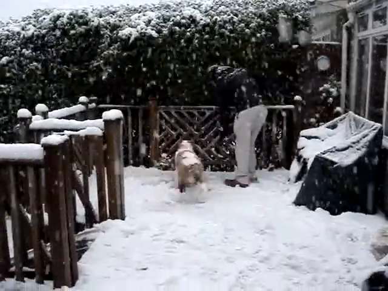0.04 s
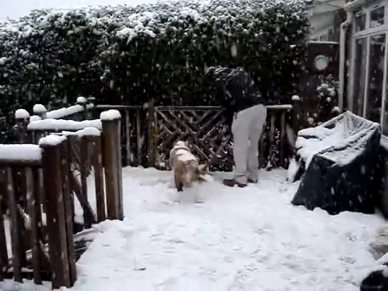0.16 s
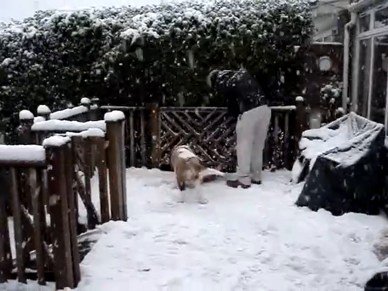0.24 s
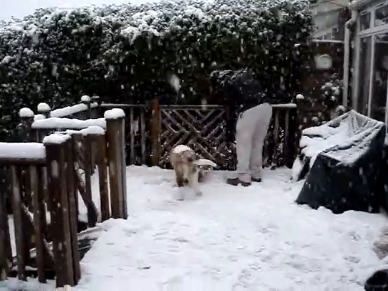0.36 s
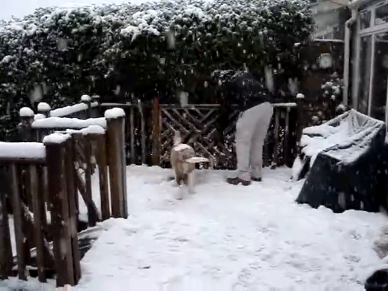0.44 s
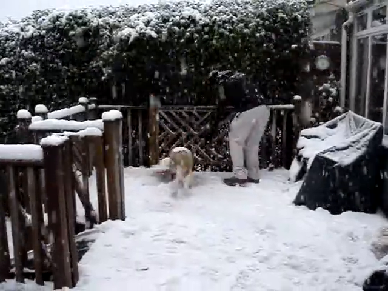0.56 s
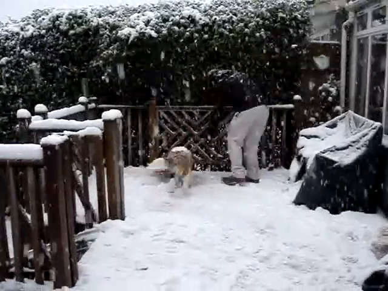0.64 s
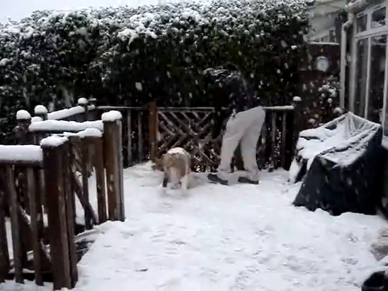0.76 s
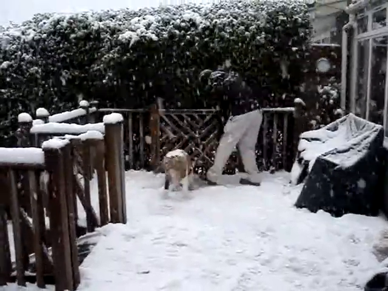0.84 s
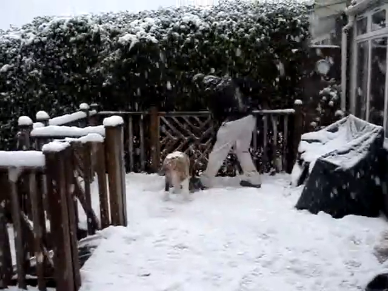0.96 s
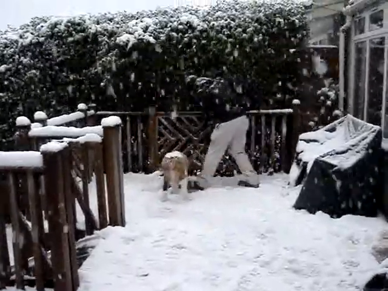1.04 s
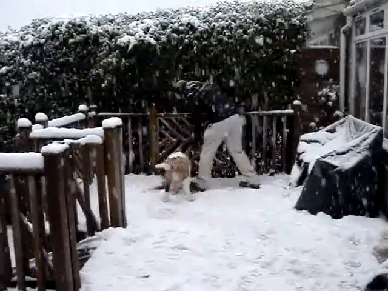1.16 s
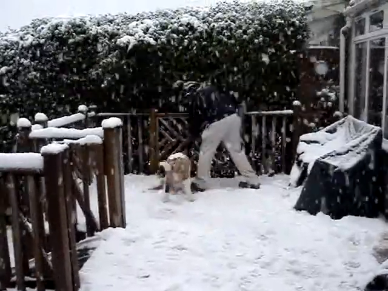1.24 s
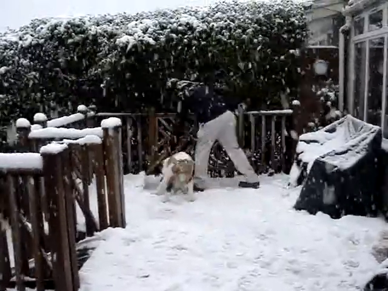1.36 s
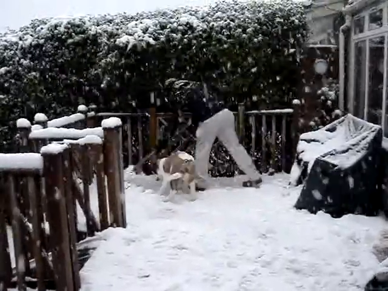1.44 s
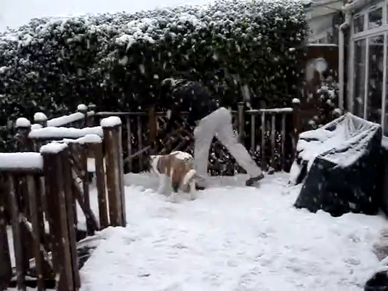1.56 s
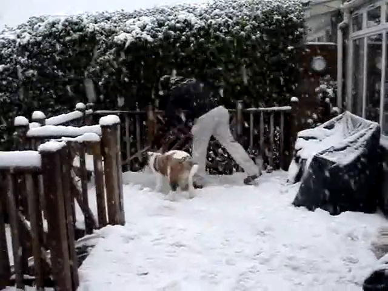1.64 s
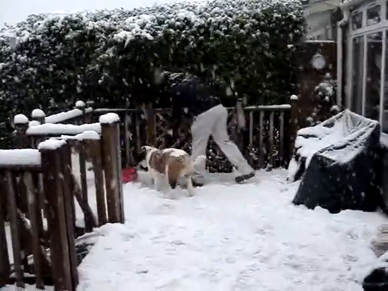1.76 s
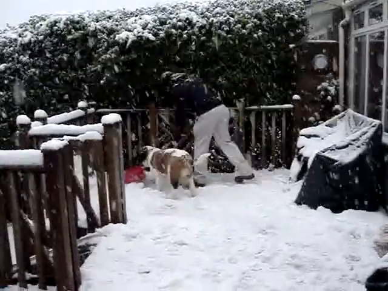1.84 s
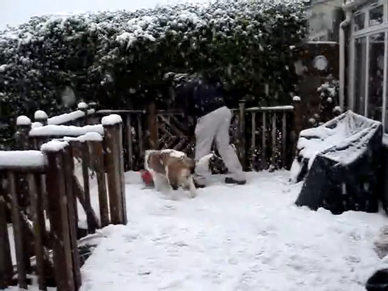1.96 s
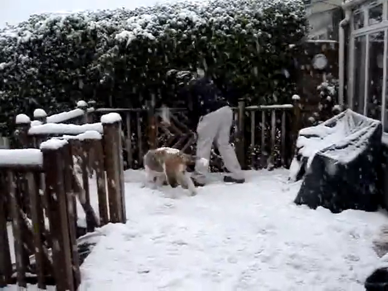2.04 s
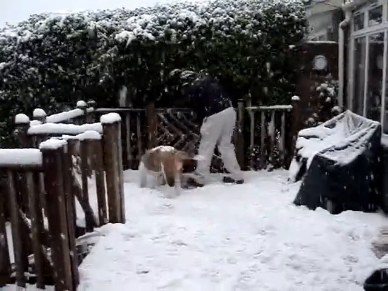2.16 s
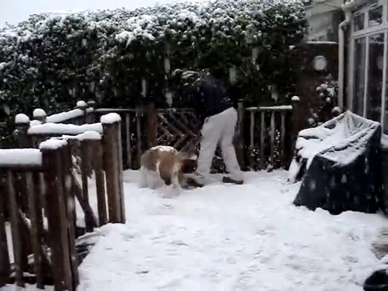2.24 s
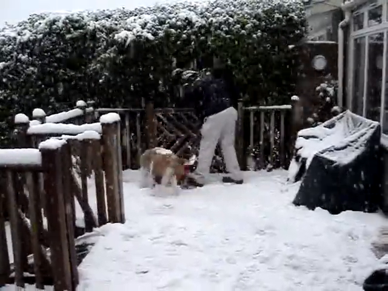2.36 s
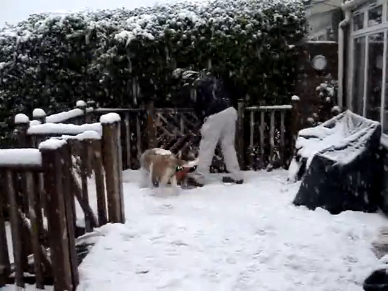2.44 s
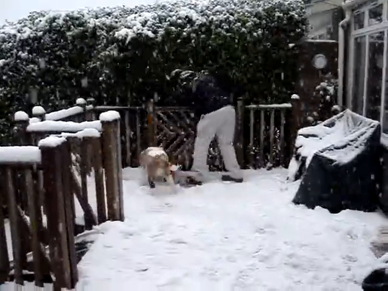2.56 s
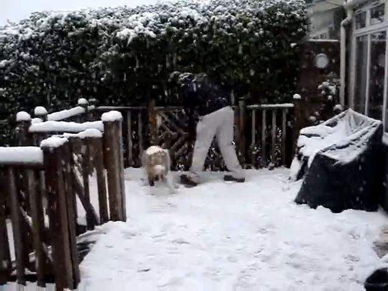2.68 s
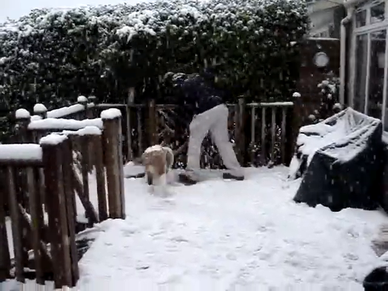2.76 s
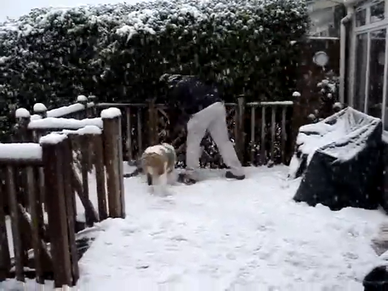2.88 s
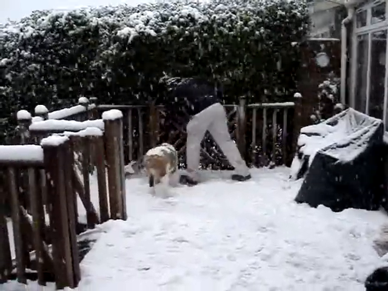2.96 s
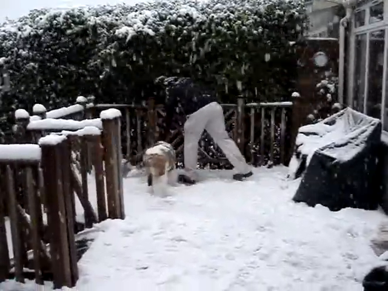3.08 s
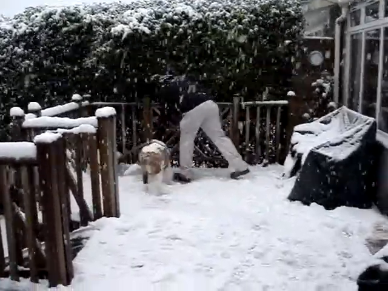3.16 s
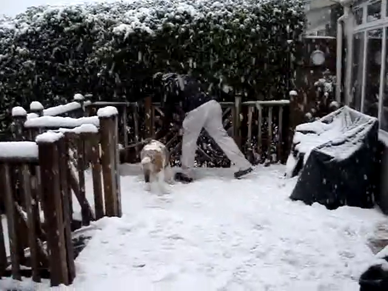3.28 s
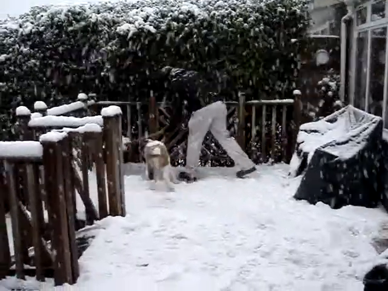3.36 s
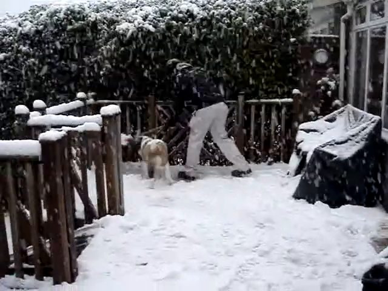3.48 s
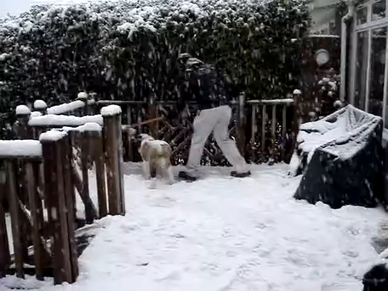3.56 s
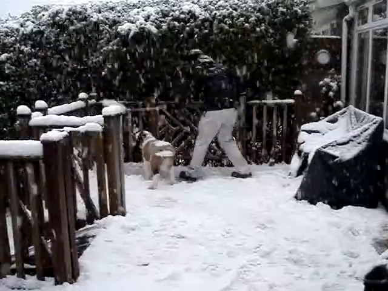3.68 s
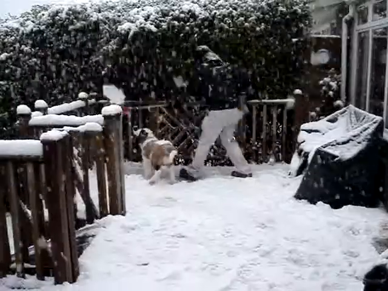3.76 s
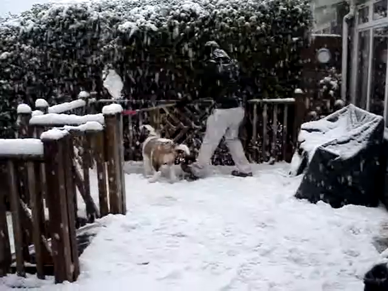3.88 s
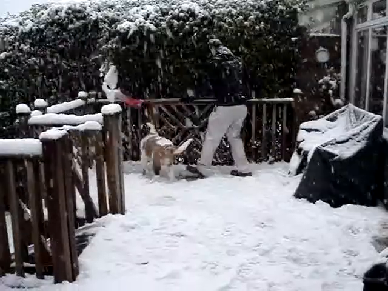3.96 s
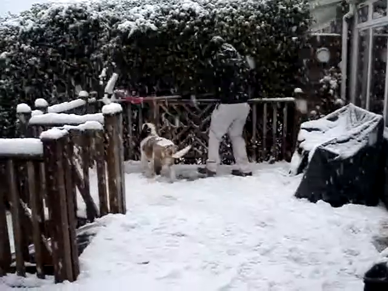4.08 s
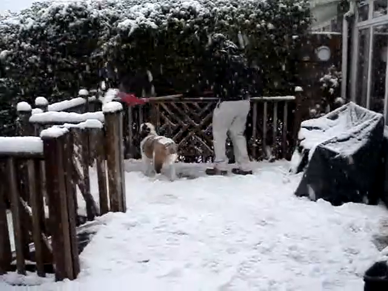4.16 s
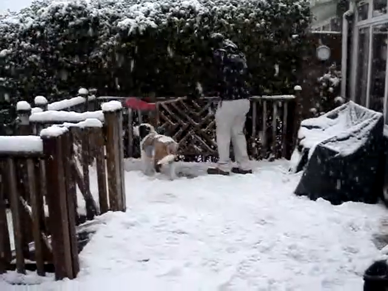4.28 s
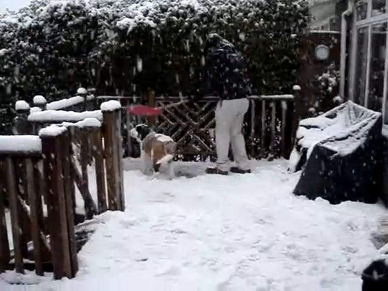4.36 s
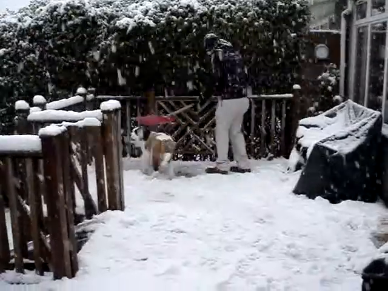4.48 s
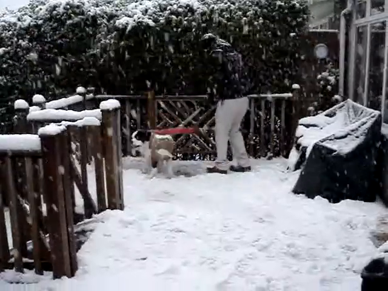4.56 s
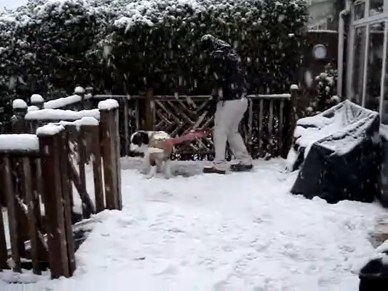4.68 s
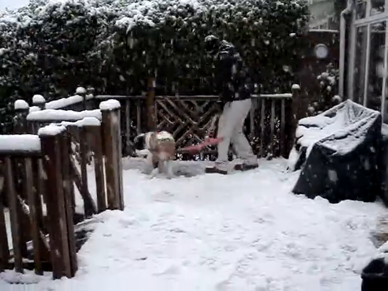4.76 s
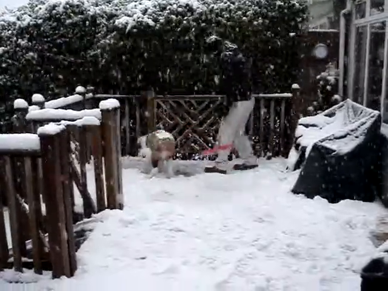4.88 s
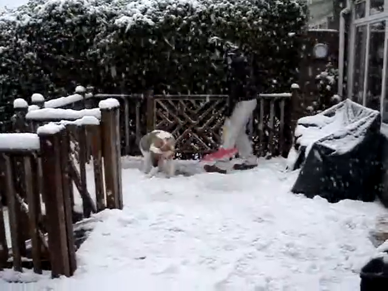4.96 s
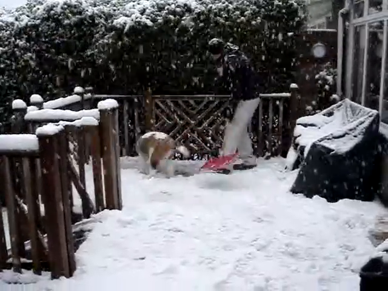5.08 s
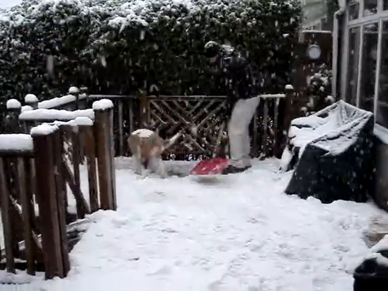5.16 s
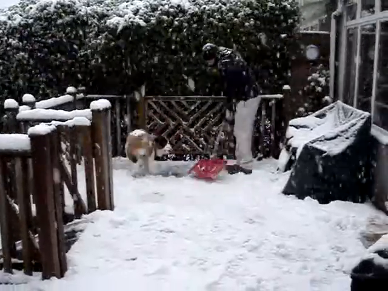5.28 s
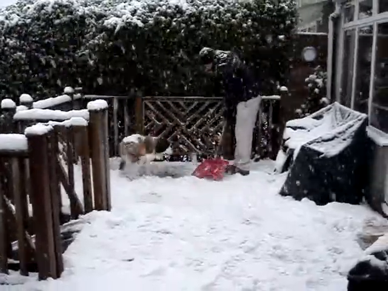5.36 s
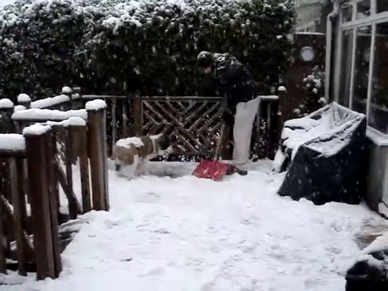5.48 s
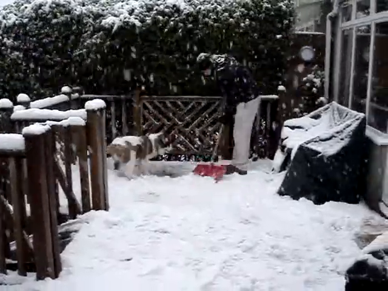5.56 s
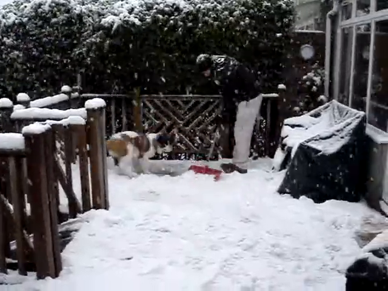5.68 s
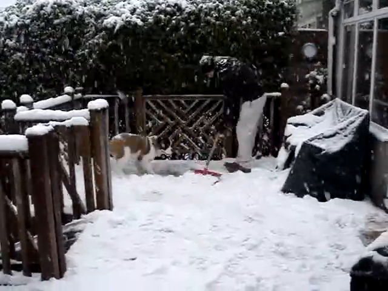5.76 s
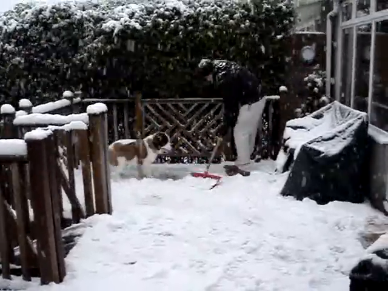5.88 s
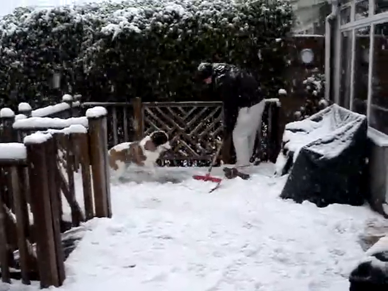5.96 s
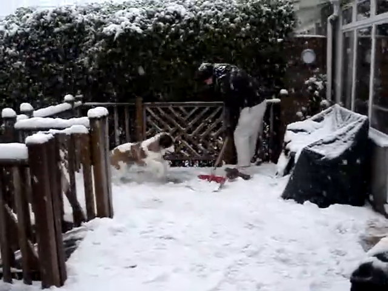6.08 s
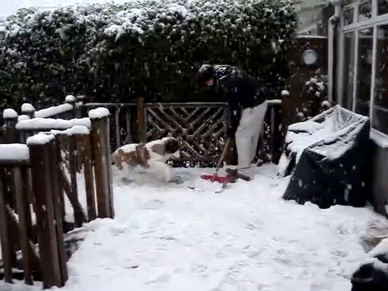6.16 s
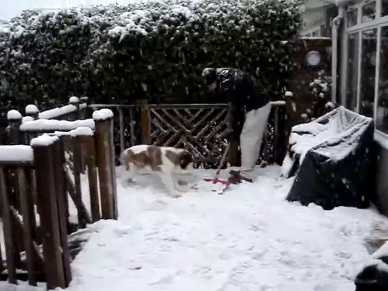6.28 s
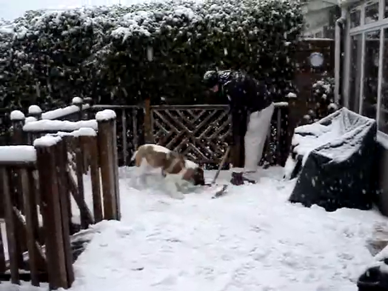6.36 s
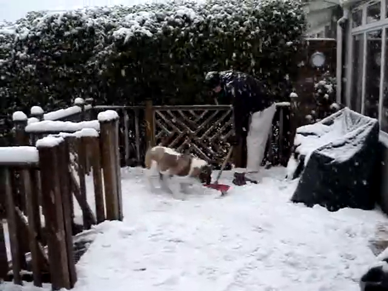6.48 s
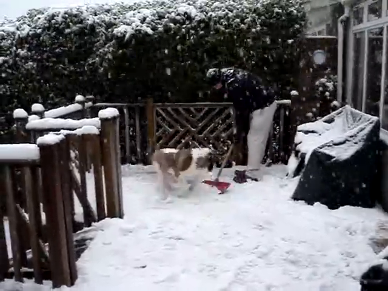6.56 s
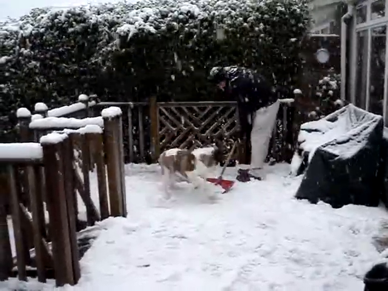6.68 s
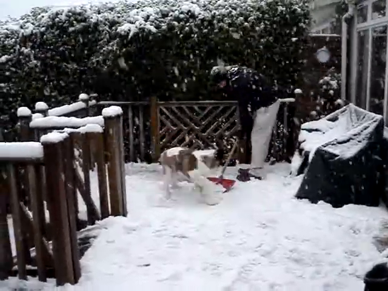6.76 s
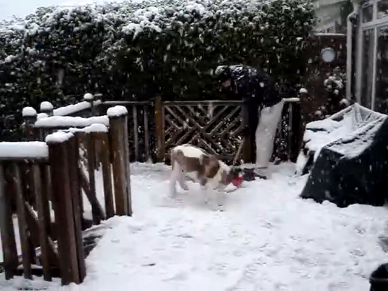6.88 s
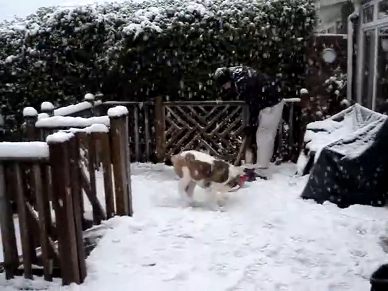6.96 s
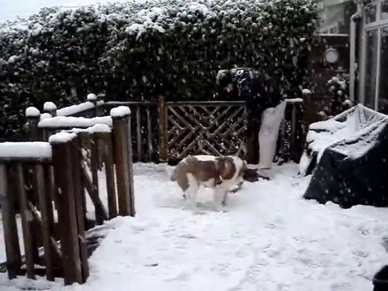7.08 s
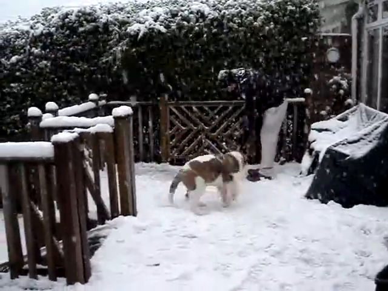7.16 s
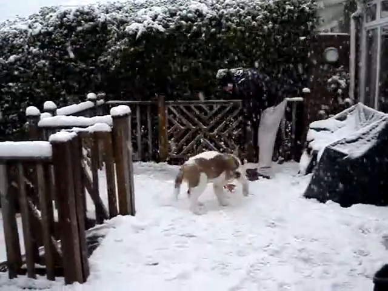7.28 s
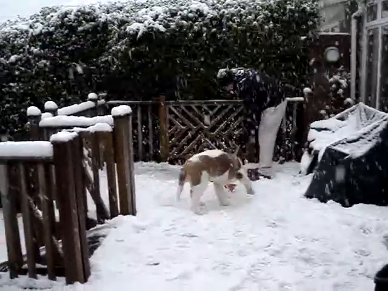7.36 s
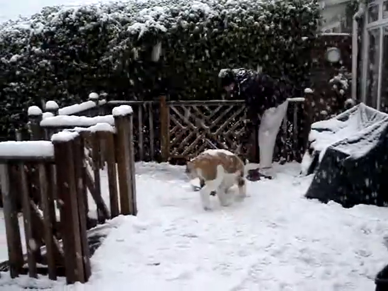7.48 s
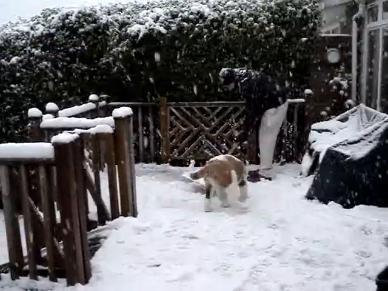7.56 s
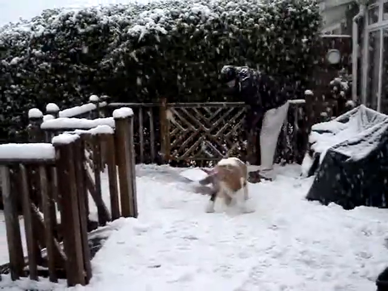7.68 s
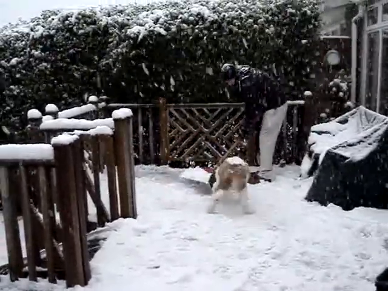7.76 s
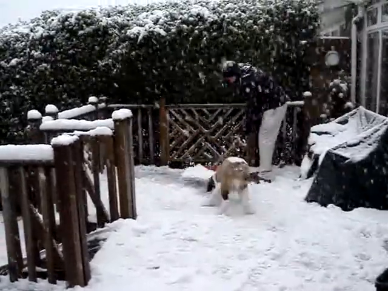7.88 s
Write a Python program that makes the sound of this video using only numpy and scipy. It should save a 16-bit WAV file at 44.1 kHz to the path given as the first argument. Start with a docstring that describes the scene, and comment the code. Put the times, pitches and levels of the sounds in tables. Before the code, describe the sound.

A plastic shovel scrapes through icy snow on a wooden deck a few metres away, in three short gritty strokes. In the pause that follows, boots and a dog's paws thud softly on the hollow boards and a load of snow is tossed with a brief rush. Three more scrapes follow, the blade knocking as it catches on the boards. The yard adds a slight echo and a faint steady hiss.

```python
"""A plastic snow shovel scrapes in short strokes over a snowy wooden deck, a few metres away.
Its edge grinds through icy snow, catches on boards and sets the blade ringing.
Boots and a dog's paws thud on the hollow deck and crunch the snow; loose snow slides and drops.
House wall and fence echo, and the garden hisses faintly."""
import sys
import numpy as np
from scipy import signal
from scipy.fft import rfft, irfft, next_fast_len
from scipy.io import wavfile
from scipy.ndimage import uniform_filter1d, map_coordinates

SR = 44100
rng = np.random.default_rng(int(sys.argv[2]) if len(sys.argv) > 2 else 0)


def master(y):
    """Save y as 16-bit WAV."""
    cut = np.clip(np.atleast_2d(y).T, -1, 1)
    pcm = np.round(cut * 32767)  # scale
    wavfile.write(sys.argv[1], SR, pcm.astype(np.int16))


N = 349707
TIME_S = np.arange(N) / SR

# envelopes, one table per stroke: time_s, edge_db, body_db
STROKES = [
    [(0.352, -38.5, -43), (0.368, -27, -30), (0.398, -16.5, -22), (0.416, -12.5, -25), (0.5, -13.5, -28.5),
     (0.572, -43.5, -43), (0.6, -47, -27)],
    [(1.034, -41, -49), (1.042, -32, -40), (1.058, -27.5, -29.5), (1.094, -19.5, -29.5),
     (1.138, -15, -28.5), (1.158, -21, -35.5), (1.206, -17, -26.5), (1.286, -23, -43), (1.3, -20, -38.5),
     (1.446, -24, -26), (1.48, -35, -51), (1.53, -60, -57)],
    [(2.474, -59, -57), (2.48, -29.5, -45), (2.49, -24.5, -34.5), (2.576, -16, -25), (2.638, -19.5, -29),
     (2.672, -14.5, -20.5), (2.702, -21, -30.5), (2.748, -18.5, -24.5), (2.874, -23.5, -34.5),
     (2.912, -20.5, -25), (2.982, -19.5, -30.5), (3.1, -44.5, -45.5)],
    [(5.54, -40, -47), (5.558, -41, -43.5), (5.586, -28, -39), (5.61, -28.5, -39), (5.638, -17.5, -21),
     (5.66, -14.5, -21.5), (5.732, -21.5, -19.5), (5.796, -21, -22.5), (5.81, -22.5, -25.5),
     (5.838, -20.5, -19.5), (5.96, -55.5, -57)],
    [(6.0, -55, -57), (6.036, -50, -48.5), (6.05, -47, -50), (6.06, -43.5, -42), (6.074, -43.5, -47),
     (6.15, -39.5, -37), (6.21, -40.5, -41), (6.248, -50, -55), (6.258, -52, -64), (6.264, -48.5, -55),
     (6.295, -42, -43)],
    [(6.293, -47.5, -41), (6.325, -24, -25), (6.371, -21.5, -19.5), (6.389, -22.5, -30),
     (6.399, -36.5, -36), (6.421, -25, -28.5), (6.467, -48.5, -56), (6.49, -53, -49)],
    [(6.86, -51, -57), (6.878, -51.5, -61), (6.898, -51, -43), (6.918, -45, -54), (6.932, -43.5, -44.5),
     (7.006, -45, -46), (7.018, -53, -49), (7.04, -57, -63), (7.046, -70, -59), (7.058, -47, -49),
     (7.068, -49, -48), (7.075, -42, -41)],
    [(7.073, -40, -53), (7.089, -35, -26.5), (7.121, -28, -26.5), (7.135, -28, -19.5), (7.161, -27, -30),
     (7.175, -32, -40), (7.188, -24, -18.5)],
    [(7.186, -19, -21), (7.194, -23, -18), (7.222, -23.5, -13), (7.238, -22.5, -32), (7.278, -31.5, -23),
     (7.338, -53, -52), (7.36, -59, -57)],
]
# deck contact per stroke: scoop_db, lip_db, boards_db (all re body_db), tilt_db
CONTACTS = [(-7, -10.5, -10.5, 2), (-6, -6, -9, 1.4), (-6, -1.5, -7, 1.3), (-3, -2, -12.5, -0.56),
            (-5, -1, -22, -1.8), (-8, -0.5, -16, -2), (-2, -3, -5, 0), (-4.5, -5, -12, -0.5),
            (-3, -5.5, -17, -1.6)]
# edge on icy snow: freq_hz, density_db
GRIT_SPECTRUM = [(29, -38), (50, -12), (173, -3), (252, -5), (321, 1), (410, -24), (625, -2.5), (2210, -2),
                 (3150, -0.5), (6540, -5), (8530, -10.5), (9960, -20), (12900, -56.5), (21900, -120)]
# blade, four scoop modes then the lip's: freq_hz, width_hz, level_db
BLADE_MODES = [(508, 24, -4), (559, 30, 0), (668, 36, -6), (723, 20, 0), (1060, 80, -1), (1514, 40, -1),
               (1745, 55, -4), (2350, 100, -7), (2620, 50, -6), (2990, 55, -6), (3390, 100, -4)]
# edge catching on a board: start_s, peak_db
CATCHES = [(0.472, -18), (2.674, -22.5), (2.763, -14.5), (2.903, -12.5), (5.661, -15.5), (5.72, -5.5),
           (6.365, -4), (7.11, -10.5), (7.154, -10), (7.193, -6), (7.211, -21.5), (7.223, 0)]
# footfalls and knocks: start_s, pitch_hz, ring_db, clack_db, weight_db
STEPS = [(.056, 245, -29.5, -32, -14.5), (0.167, 104, -43, -40.5, -50), (.196, 200, -38, -42, -61),
         (.31, 250, -32.5, -41, -50), (.589, 150, -27, -36.5, -47), (.724, 104, -37.5, -40, -32),
         (.982, 250, -40.5, -47, -58), (1.57, 170, -43, -52, -65), (1.659, 140, -37.5, -60, -53),
         (2.007, 100, -48, -64, -29), (2.062, 140, -38.5, -42, -46), (2.274, 170, -34, -31, -58),
         (2.365, 166, -20.5, -38.5, -32), (3.384, 330, -39, -50, -31), (3.434, 330, -41, -50, -45),
         (3.684, 300, -38, -42.5, -41), (3.764, 166, -33.5, -47, -43), (3.964, 330, -46, -40.5, -62),
         (4.049, 330, -38, -43, -64), (4.251, 320, -44, -47, -55), (4.384, 104, -37, -49, -50),
         (4.458, 104, -33, -43.5, -35), (4.49, 100, -39, -59, -29), (4.557, 140, -27, -35.5, -39),
         (4.69, 150, -34.5, -36, -41), (4.862, 166, -25.5, -35.5, -29), (4.957, 125, -32.5, -42.5, -49),
         (5.026, 166, -24.5, -40, -42), (5.136, 170, -46, -43.5, -52), (5.263, 170, -24.5, -29.5, -35),
         (5.311, 320, -31.5, -44, -21.5), (5.337, 300, -32, -41.5, -30), (5.378, 170, -38, -45, -34),
         (5.499, 104, -54, -47, -30), (5.561, 166, -33, -40.5, -28), (5.89, 380, -25, -37.5, -21),
         (6.251, 110, -40, -50, -54), (6.412, 166, -39, -29.5, -25), (6.799, 166, -44.5, -50.5, -41),
         (6.996, 320, -41.5, -43, -61), (7.472, 115, -20, -24, -41), (7.528, 110, -32, -40, -46),
         (7.622, 166, -37, -42, -52), (7.654, 250, -43, -47.5, -55)]
# hollow deck: freq_hz, width_hz
DECK_MODES = [(58, 24), (97, 28), (120, 24), (166, 26), (250, 45), (322, 40), (420, 50), (570, 70),
              (720, 80), (1050, 160)]
# snow sliding, dropped or thrown: start_s, level_db, rise_s, t60_s, tilt_db
PUFFS = [(0.2, -32.5, .02, 0.1, -2), (0.228, -35.5, .003, 0.059, -1), (0.648, -30.5, 0.0029, 0.069, 1),
         (.7, -41, .004, 0.14, 5.5), (1.6, -34, .004, 0.074, -3.5), (1.873, -45.5, 0.0061, 0.62, 1),
         (2.066, -50, 0.0044, .3, 4), (2.158, -37.5, 0.0029, 0.083, -2), (2.274, -45.5, 0.0027, 0.088, -2),
         (2.359, -29, .002, 0.051, -1.5), (3.391, -38, 0.0023, 0.09, -1), (3.52, -32, 0.074, 0.49, 0.5),
         (3.853, -32, 0.0027, 0.074, 0), (3.99, -34, 0.00066, 0.23, 0), (4.018, -19, 0.021, 0.14, 2),
         (4.076, -30.5, 0.029, 0.12, 3.5), (4.198, -41.5, 0.0034, 0.13, 3), (4.287, -34, .001, 0.092, -3),
         (4.459, -45.5, .002, 0.12, 2.5), (4.555, -40.5, 0.0038, 0.28, 4), (4.692, -47, 0.0022, 0.039, 3),
         (4.864, -34, 0.0027, 0.032, -7), (5.03, -30.5, 0.0038, 0.052, -0.5), (5.101, -36.5, 0.02, .15, 0),
         (5.139, -40.5, 0.0012, .03, -5), (7.473, -49, 0.0027, 0.071, 2), (7.625, -41.5, 0.002, 0.074, -5)]
# loose snow: freq_hz, density_db
POWDER_SPECTRUM = [(410, -35), (700, 7.5), (2100, 4.5), (2270, 2.5), (2430, 5.5), (5780, 2.5), (9960, -6),
                   (12900, -45), (21900, -120)]
# restless feet and paws: time_s, level_db
SHUFFLE_LEVELS = [(0, -50), (.9, -55.5), (1.7, -54), (2.2, -50.5), (2.46, -55.5), (3.3, -53), (3.7, -52),
                  (3.9, -51.5), (4.3, -51.5), (4.6, -51.5), (4.8, -54), (5.1, -48), (5.45, -48), (6.0, -62),
                  (6.7, -51), (7.4, -61.5), (7.93, -53.5)]
# crisp and dull crunch: freq_hz, density_db
CRISP_SPECTRUM = [(530, -37), (900, 5.5), (985, -6), (1160, 6), (1290, 3.5), (5610, -2.5), (9960, -14),
                  (12900, -66), (21900, -120)]
DULL_SPECTRUM = [(88, -55), (150, -43), (313, -2.5), (373, -14.5), (425, -3), (588, -4), (2000, -23.5),
                 (2600, -63), (4400, -120)]
# yard echo: freq_hz, t60_s
YARD_DECAY = [(100, 0.7), (1000, 0.32), (10000, 0.3)]
# background hiss: freq_hz, density_db
AIR_SPECTRUM = [(12, -25), (20, 16), (95, 7), (298, 4), (377, 1.5), (651, 2.5), (1790, -11), (1940, -15.5),
                (6740, -11), (8750, -13.5), (9960, -25), (12900, -45), (21900, -120)]

DULLING_DB, LUMPS_DB, JOLT_DB_PER_OCTAVE = 5, 2, -0.5
FALLOFF_DB_PER_OCTAVE, CLACK_HZ, JOIST_HZ = 9.5, 550, 58
CRUNCH_DB, CRUNCH_T60_S = -5.5, 0.2  # level re clack_db
SLIDE_DB, SLIDE_T60_S = -20.5, 0.47  # level re edge_db
ECHO_DB, AIR_DB = -15.5, -50
TILT_PIVOT_HZ, LOW_CUT_HZ, TOP_HZ = 3500, 38, 10110


def shovel():
    """Fine grains break at the edge; coarser lumps shake the blade and the boards."""
    grains = crystals(spread_db=3.0, clump_db=1.25)
    edge = coloured(shifting_load(grains, depth_db=2.5), GRIT_SPECTRUM)
    low, high = split_bands(edge)
    lumps = crystals(spread_db=2.5, clump_db=2.5)
    lip_modes = [(hz, width, db + JOLT_DB_PER_OCTAVE * np.log2(hz)) for hz, width, db in BLADE_MODES[4:]]
    board_modes = [(hz, width, 0) for hz, width in DECK_MODES[5:7]]
    scoop, lip, boards = [amp(LUMPS_DB * wobble(20)) * unit(resonant(lumps, modes))
                          for modes in (BLADE_MODES[:4], lip_modes, board_modes)]
    out = np.zeros(N)
    for stroke, (scoop_db, lip_db, boards_db, tilt_db) in zip(STROKES, CONTACTS):
        span, edge_gain, body_gain = stroke_gains(stroke)
        progress = np.linspace(-.5, .5, len(edge_gain))
        bright = amp(tilt_db - DULLING_DB * progress)  # bare ice is brighter than soft snow
        grind = low[span] / bright + high[span] * bright
        body = amp(scoop_db) * scoop[span] + amp(lip_db) * lip[span] + amp(boards_db) * boards[span]
        out[span] += edge_gain * grind + body_gain * body
    return out


def stroke_gains(stroke):
    """Sample span, edge gain and body gain of a stroke, faded at both ends."""
    time_s, edge_db, body_db = np.transpose(stroke)
    span = slice(round(time_s[0] * SR), round(time_s[-1] * SR))
    t = TIME_S[span]
    fade = np.sqrt(np.clip(np.minimum(t - time_s[0], time_s[-1] - t) * 150, 0, 1))
    return span, fade * amp(np.interp(t, time_s, edge_db)), fade * amp(np.interp(t, time_s, body_db))


def crystals(spread_db, clump_db):
    """Ice grains break in clumps, a few large among many small."""
    size = np.minimum(rng.exponential(size=N), 3)
    clumps = wobble(40) + wobble(170)
    return unit(amp(spread_db * size + clump_db * clumps) * rng.standard_normal(N))


def shifting_load(x, depth_db):
    """Brief resonances come and go as the snow load shifts."""
    bins = signal.stft(x, nperseg=512)[2]
    patches = uniform_filter1d(rng.standard_normal(bins.shape), size=5, axis=0)
    patches = uniform_filter1d(patches, size=5, axis=1)
    return signal.istft(bins * amp(depth_db * unit(patches)), nperseg=512)[1][:N]


def catches():
    """A jolt rings all blade modes at once; the snow load damps them fast."""
    out, t = np.zeros(N + SR), TIME_S[:SR // 10]
    for start_s, peak_db in CATCHES:
        ring = np.zeros(len(t))
        for k, (hz, width_hz, db) in enumerate(BLADE_MODES):
            gain = (-1) ** k * amp(db + JOLT_DB_PER_OCTAVE * np.log2(hz) + rng.normal(0, 1.6))
            ring += gain * np.exp(-1.8 * np.pi * width_hz * t) * np.sin(2 * np.pi * hz * t)
        out[round(start_s * SR):][:len(t)] += amp(peak_db) * ring / np.abs(ring).max()
    return out[:N]


def footsteps():
    """A foot lands in three quick pushes; each rings the deck's modes at new strengths."""
    out, t = np.zeros(N + SR), TIME_S[:SR // 5]
    hz, width_hz = np.transpose(DECK_MODES)[:, :, None]
    envelope = np.exp(-np.pi * width_hz * t) * (1 - np.exp(-t * hz * 1.5))

    def around(centre_hz):
        return amp(-FALLOFF_DB_PER_OCTAVE * np.abs(np.log2(hz / centre_hz)))

    for start_s, pitch_hz, ring_db, clack_db, weight_db in STEPS:
        strength = amp(ring_db) * around(pitch_hz) + amp(clack_db) * around(CLACK_HZ)
        strength += amp(weight_db) * around(JOIST_HZ) ** 2
        for delay_s, push_db in [(0, 7.5), (.011, -2), (.024, 0)]:
            level_jitter, pitch_jitter, time_jitter = rng.standard_normal((3, len(hz), 1))
            push_s = start_s + delay_s * amp(2 * time_jitter[0, 0])
            tones = np.sin(2 * np.pi * hz * (1 + pitch_jitter / 50) * t)
            modes = strength * amp(push_db + 2 * level_jitter) * envelope * tones
            out[round(push_s * SR):][:len(t)] += modes.sum(axis=0)
    return out[:N]


def snow_puffs():
    """Loose snow leaves blade or boot in a brief crisp rush; packed snow is duller."""
    out, t = np.zeros(N + SR), TIME_S[:SR // 2]
    powder = coloured(crystals(spread_db=1.0, clump_db=-2.0), POWDER_SPECTRUM)
    low, high = [np.pad(band, (0, SR)) for band in split_bands(powder)]
    for start_s, level_db, rise_s, t60_s, tilt_db in PUFFS:
        span = slice(round(start_s * SR), round(start_s * SR) + len(t))
        envelope = amp(level_db - 60 * t / t60_s) * (1 - np.exp(-t / rise_s))
        out[span] += envelope * (low[span] / amp(tilt_db) + high[span] * amp(tilt_db))
    return out[:N]


def snow_crunch():
    """Restless feet crunch faintly; the crunch swells at footfalls and as snow slides after strokes."""
    stir = wobble(14)
    crisp = amp(0.18 * stir) * coloured(crystals(spread_db=2.0, clump_db=1.43), CRISP_SPECTRUM)
    dull = amp(2.4 * stir) * coloured(crystals(spread_db=2.5, clump_db=2.5), DULL_SPECTRUM)
    shuffle = amp(np.interp(TIME_S, *np.transpose(SHUFFLE_LEVELS)))
    pushed, pressed, t = np.zeros(N), np.zeros(N + SR), TIME_S[:SR // 2]
    for stroke in STROKES:
        span, edge_gain, _ = stroke_gains(stroke)
        pushed[span] += edge_gain
    for start_s, _, _, clack_db, _ in STEPS:
        pressed[round(start_s * SR):][:len(t)] += amp(clack_db + CRUNCH_DB - 60 * t / CRUNCH_T60_S)
    linger = amp(-60 * t / SLIDE_T60_S)
    sliding = amp(SLIDE_DB) * np.abs(signal.fftconvolve(pushed, linger / linger.sum())[:N])
    crisp_gain = shuffle + sliding + amp(-15.5) * pressed[:N]
    dull_gain = amp(-7) * shuffle + sliding + pressed[:N]
    return crisp_gain * crisp + dull_gain * dull


def yard_echo(x):
    """House wall and fence reflect; the bass lingers longest."""
    hz, t, bins = signal.stft(rng.standard_normal(SR // 2), SR, nperseg=256)
    decay = amp(-60 * t / log_interp(YARD_DECAY, hz)[:, None])
    tail = signal.istft(bins * decay, SR, nperseg=256)[1]
    delayed = np.pad(x, (500, 0))
    return signal.fftconvolve(delayed, tail / np.linalg.norm(tail))[:N]


def air():
    """Garden and microphone hiss, wavering slightly."""
    return amp(AIR_DB + 1.1 * wobble(1.9)) * coloured(rng.standard_normal(N), AIR_SPECTRUM)


def amp(db):
    return 10 ** (np.asarray(db) / 20)


def unit(x):
    return x / np.sqrt(np.mean(x ** 2) + 1e-20)


def log_interp(points, hz):
    knots_hz, values = np.transpose(points)
    return np.interp(np.log(hz + 1), np.log(knots_hz + 1), values)


def wobble(rate_hz):
    """Smooth random curve, rate_hz knots a second."""
    return map_coordinates(rng.standard_normal(int(N * rate_hz / SR) + 4), [TIME_S * rate_hz])


def filtered(x, response):
    size = next_fast_len(N + SR // 4)
    return irfft(rfft(x, size) * response(np.fft.rfftfreq(size, 1 / SR)), size)[..., :N]


def split_bands(x):
    low = filtered(x, lambda hz: 1 / (1 + (hz / TILT_PIVOT_HZ) ** 4))
    return low, x - low


def coloured(x, spectrum):
    """x shaped by a spectrum, rms 1."""
    return unit(filtered(x, lambda hz: amp(log_interp(spectrum, hz))))


def resonant(x, modes):
    """x through parallel resonances of alternating sign."""
    return filtered(x, lambda hz: sum(
        (-1) ** k * amp(db) * 1j * hz * width_hz / (mode_hz ** 2 - hz ** 2 + 1j * hz * width_hz)
        for k, (mode_hz, width_hz, db) in enumerate(modes)))


def scene():
    """Near sources, their echo, crunch and hiss; mono on two channels."""
    near = shovel() + catches() + footsteps() + snow_puffs()
    hiss = air()
    mono = near + amp(ECHO_DB) * yard_echo(near) + snow_crunch() + hiss
    return np.array([mono, mono])


def record(dry):
    """A small microphone loses deep bass; its input stage rounds peaks; the band ends sharply."""
    picked = filtered(dry, lambda hz: (1j * hz / (LOW_CUT_HZ + 1j * hz)) ** 2)
    ceiling = .75
    rounded = picked / (1 + np.abs(picked / ceiling) ** 4) ** (1 / 4)
    return filtered(rounded, lambda hz: hz < TOP_HZ)


dry = scene()
out = record(dry)
master(out)
```